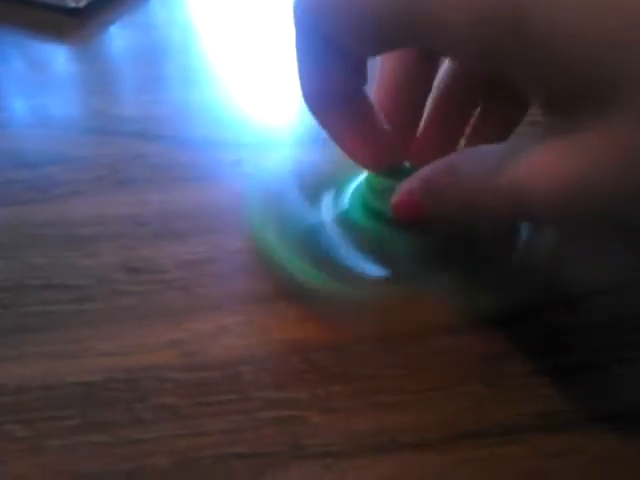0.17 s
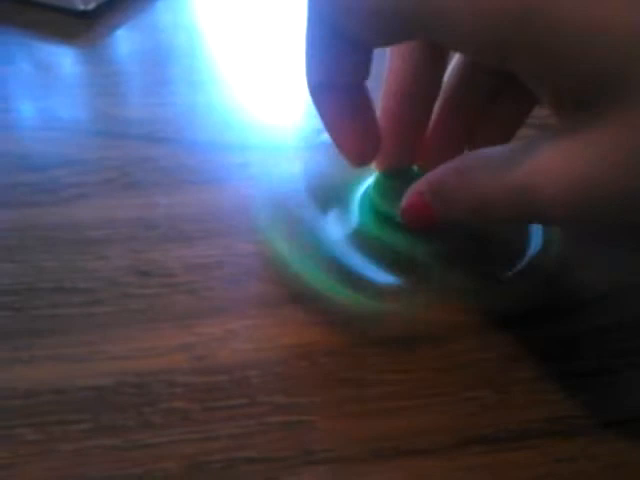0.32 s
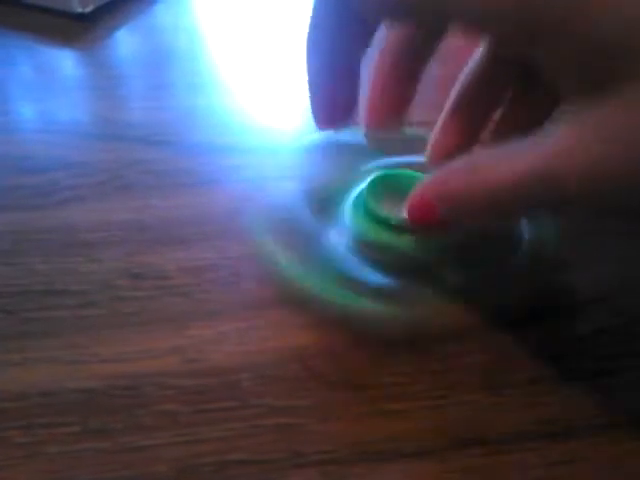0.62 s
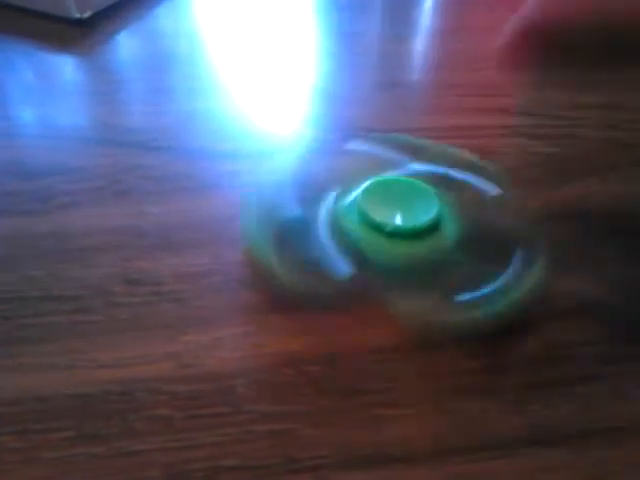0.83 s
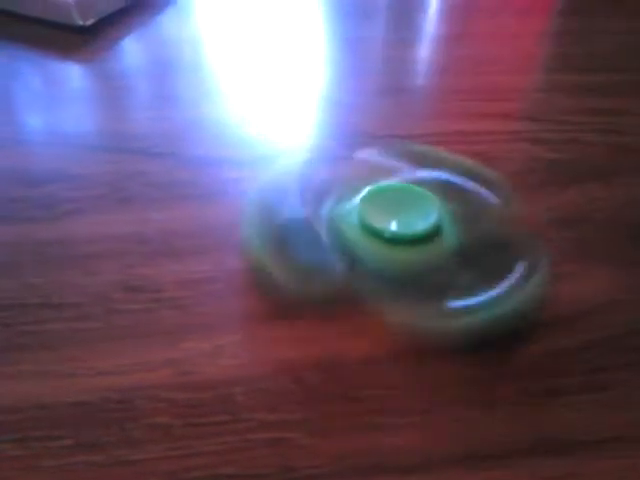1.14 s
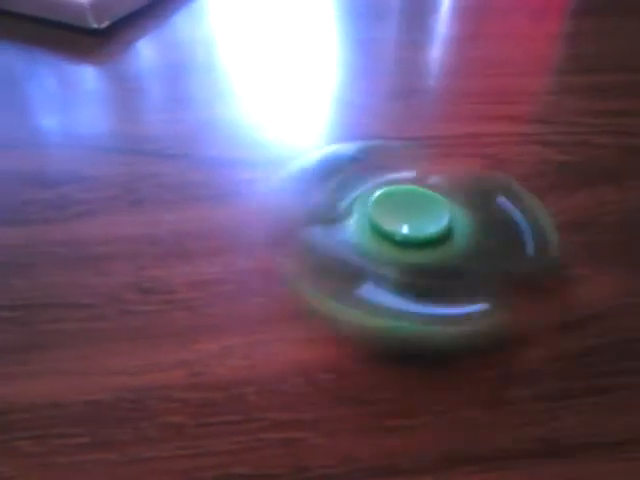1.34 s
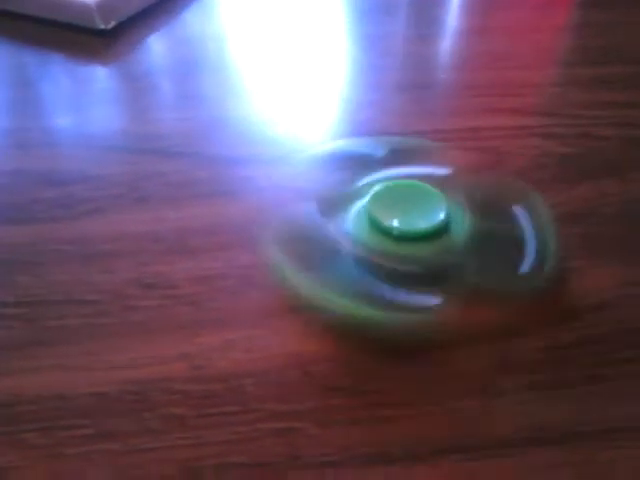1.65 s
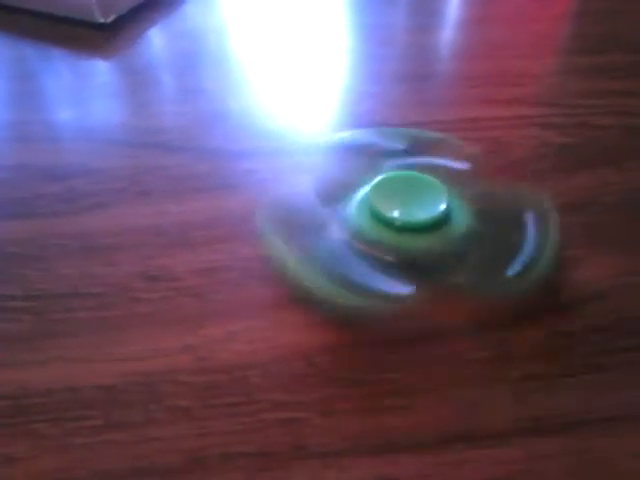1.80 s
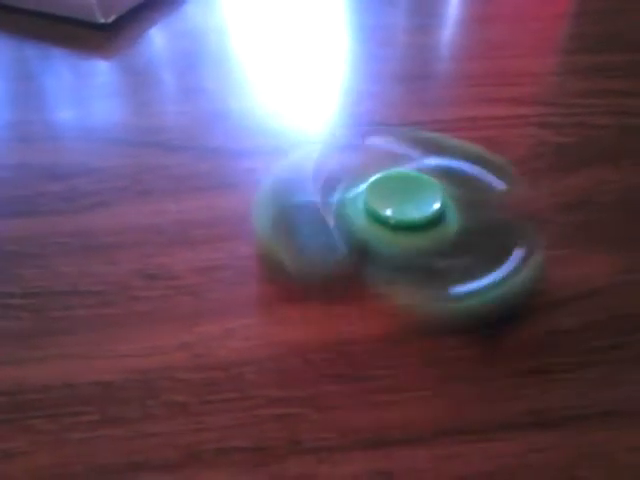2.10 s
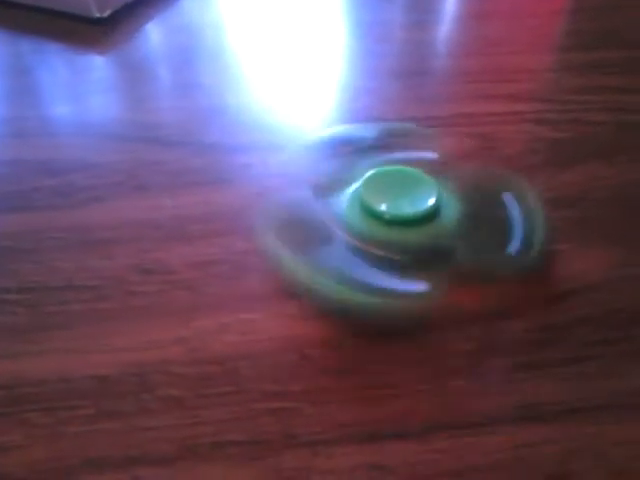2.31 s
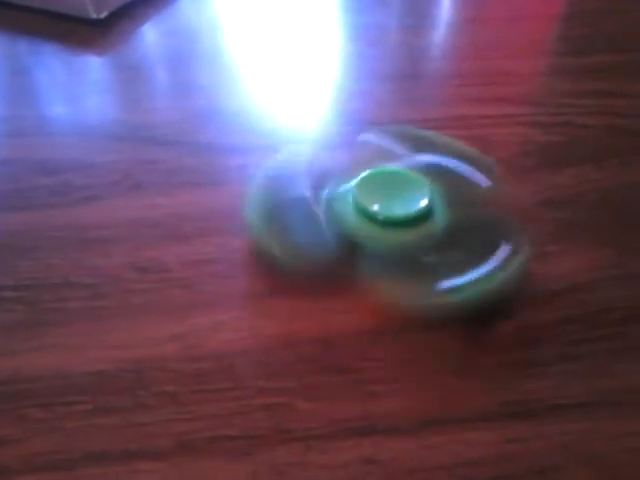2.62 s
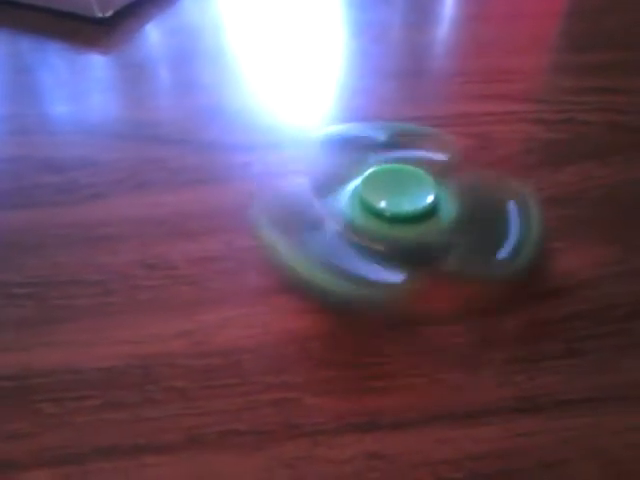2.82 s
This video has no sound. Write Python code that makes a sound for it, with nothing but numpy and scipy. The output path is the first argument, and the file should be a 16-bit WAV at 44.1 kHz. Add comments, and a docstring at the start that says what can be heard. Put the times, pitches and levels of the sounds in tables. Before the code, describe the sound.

A plastic fidget spinner whirs and rattles on a wooden table, ticking in quick uneven knocks

```python
"""A plastic spinner wobbles on a wooden table close to a small microphone.
An arm knocks on some turns: a grainy plastic tick with a short hiss of tail, and a dull ring of table modes.
Between knocks the cap chatters on the wood: random taps ring the modes, and grains of hiss and scrape join in.
Fingers bump the table, heard as bursts of low resonant noise; quiet room noise lies under it all.
Patches of the treble differ between the two channels."""
import sys
import numpy as np
from scipy import signal
from scipy.io import wavfile
from scipy.ndimage import uniform_filter1d

SR = 44100
rng = np.random.default_rng(int(sys.argv[2]) if len(sys.argv) > 2 else 0)


def volts(x):
    """Linear amplitude factor 10**(x/20) for a level x in dB, scalar or array-like."""
    e = np.asarray(x, float) / 20
    return 10 ** e


def log_audio(samples):
    """Write samples as a 16-bit WAV file to the path given in sys.argv[1]."""
    # one column per channel
    frames = np.atleast_2d(samples).T
    # limit to full scale, then quantise
    limited = np.clip(frames, -1, 1)
    pcm = np.round(limited * 32767).astype(np.int16)
    wavfile.write(sys.argv[1], SR, pcm)


N = 130095

# Knocks of the arm. Each row: start in seconds, tick level in dB, thud peak in dB, centre of the tick's
# colour in Hz, lift of the lowest plastic resonance in dB, lift of the next two in dB.
KNOCKS = [(0.054, -60, -44, 6860, 4, 10), (0.2082, -77, -44.5, 5200, 3, 4), (0.2289, -46, -49, 9700, 14, 5),
          (0.2625, -47.5, -48, 9900, 17, -17), (0.3142, -46, -36.5, 9500, 6, 0),
          (0.3629, -46.5, -34.5, 10000, 4, 4), (0.4084, -72, -61, 9930, 5, -3),
          (0.4625, -36, -46, 9300, 14.5, 3.5), (0.5086, -63, -36, 9750, 0, 13),
          (0.5637, -46, -35.5, 9400, 17, -11), (0.614, -40, -39, 9800, 21, 4),
          (0.6648, -30.5, -44, 8400, 12, 7.5), (0.6694, -33.5, -54, 8600, 11, 6),
          (0.7172, -22, -32, 7160, -12, -1), (0.768, -27.5, -32.5, 8400, 0.5, -1),
          (0.8177, -34.5, -37, 10600, -15, -8), (0.9206, -37.5, -35, 9100, 6, 3),
          (0.9698, -52.5, -39.5, 6900, -6, 20), (1.0277, -39, -37, 8900, 18.5, 10),
          (1.0734, -47, -38, 8900, 8, 10), (1.1292, -36.5, -35, 9400, 10.5, -28),
          (1.1808, -29.5, -37.5, 9200, -5, 4), (1.2308, -49, -59, 4780, 5, 10),
          (1.284, -27.5, -38, 7200, -3, 12.5), (1.2902, -30, -40.5, 10100, 11, 13),
          (1.3363, -51.5, -37.5, 7800, -3, 14), (1.3965, -29.5, -40, 7700, 10.5, 12.5),
          (1.4021, -34.5, -41, 9550, 21, 15), (1.502, -30.5, -31, 8750, 4, 10),
          (1.5067, -31.5, -35, 6450, 9, 4), (1.5133, -36, -44, 6300, 15, 18),
          (1.5553, -35, -56, 9680, 15, 14), (1.5606, -30.5, -32, 5430, -8, 2),
          (1.6076, -24.5, -33, 7050, 3.5, -5), (1.619, -27, -33.5, 5750, -25, 2),
          (1.6449, -34, -37.5, 6500, 5, 0), (1.6604, -35.5, -43.5, 6800, 3, -12),
          (1.7149, -28.5, -35.5, 10800, -2, -8), (1.718, -27, -35, 5570, 5, 12),
          (1.7719, -35, -39, 8400, -4, -0.5), (1.8832, -31.5, -41, 7100, -0.5, -7.5),
          (2.0062, -56, -47.5, 8900, -2, 12), (2.1013, -29.5, -38, 6800, -1, -3.5),
          (2.2744, -32.5, -42, 5400, -7.5, -8), (2.3864, -28.5, -46, 7700, -18, -14),
          (2.562, -81, -45, 9600, 11, -5), (2.616, -30, -35, 8100, -24, 1),
          (2.6781, -50.5, -45, 9450, 2, 7), (2.7314, -48, -48, 6400, 2, 5),
          (2.7543, -56, -45, 9440, 26, 10), (2.814, -56, -48.5, 9000, 3, 10.5)]
# Table top modes. Each row: frequency in Hz, level in dB, t60 in seconds.
WOOD = [(60.1, -0.5, 0.09), (116.9, -6, 0.18), (154.4, -9, 0.28), (207.1, 1, 0.11), (230, -4.5, 0.32),
        (268.6, 3, 0.16), (319.2, 5.5, 0.043), (351, 0.5, 0.069), (398.5, -0.5, 0.076), (522, -9.5, 0.064),
        (635.6, -6.5, 0.047), (769, -14.5, 0.056), (891, -9.5, 0.045), (1071, -13, 0.033),
        (1566, -10, 0.058)]
# Plastic body resonances. Each row: frequency in Hz, width of the first of two passes in Hz, level in dB.
PLASTIC = [(1440, 258, -2), (2513, 425, -4.5), (3630, 700, 0), (5784, 1250, -3.5), (6800, 730, 0.5),
           (9050, 1570, 1.5), (10100, 790, 2.5), (10910, 850, -2), (13140, 1000, -6.5)]


def evened(x):
    """Scales to an rms of 1."""
    return x / np.sqrt(np.mean(x ** 2) + 1e-20)


def curve(table, column=1):
    """One column of a table, joined by straight lines in time."""
    rows = np.array(table)
    return np.interp(np.arange(N) / SR, rows[:, 0], rows[:, column])


def add(mix, start_s, sound):
    """Adds a sound into the mix, cut at the end."""
    part = mix[round(start_s * SR):][:len(sound)]
    part += sound[:len(part)]


def resonate(x, hz, width_hz):
    """A resonance of gain 1: shift to 0 Hz, one-pole low-pass, shift back."""
    r = np.exp(-np.pi * width_hz / SR)
    turn = np.exp(2j * np.pi * hz * np.arange(len(x)) / SR)
    return 2 * (turn * signal.lfilter([1 - r], [1, -r], x / turn)).real


def resonate_twice(x, hz, width_hz):
    """Two resonances in series, the second twice as wide."""
    return resonate(resonate(x, hz, width_hz), hz, 2 * width_hz)


def clicks(per_s, spread_db):
    """A random train of clicks of either sign, a few of them large."""
    size = volts(spread_db * np.minimum(rng.exponential(1, N), 4))
    sign = rng.choice([-1., 1.], N)
    return size * sign * (rng.random(N) < per_s / SR)


def wood_ring(sizes):
    """The table's decaying modes after one soft push; sizes says how much each mode is struck."""
    push_decay_s = 0.00075 / 4
    t = np.arange(SR // 5) / SR
    ring = np.zeros(len(t))
    for size, (hz, db, t60_s) in zip(sizes, WOOD):
        ring += size * volts(db - 60 * t / t60_s) * np.sin(2 * np.pi * hz * t)
    push = np.exp(-t[:400] / push_decay_s)
    return np.convolve(ring, push / push.sum())[:len(t)]


def plastic(x, gains_db):
    """The spinner's body colours a burst: resonances of set share, neighbours alternating in sign."""
    out = np.zeros(len(x))
    for k, ((hz, width_hz, db), gain_db) in enumerate(zip(PLASTIC, gains_db)):
        ring = resonate_twice(x, hz, width_hz)
        out += (-1) ** k * volts(db + gain_db) * np.sqrt(width_hz) * ring / np.linalg.norm(ring)
    return out * np.linalg.norm(x)


def room():
    """Hiss and rumble: noise shaped in short frames, with a slight flicker and uneven patches."""
    # Each row: frequency in Hz, relative density in dB per Hz.
    spectrum = [(15, -29), (25, -20), (153, -11.5), (245, 1), (506, -8.5), (679, -10.5), (862, -8),
                (1360, -18.5), (1510, -15.5), (2190, -18), (4870, -20), (6700, -23), (7860, -21.5),
                (9220, -29.5), (14500, -20)]
    level_db, flicker_db, patchy_db = -69, 1.5, 1.5
    frames, hz = N // 256 + 5, np.fft.rfftfreq(1024, 1 / SR)
    noise = rng.standard_normal((frames, 513, 2)) @ [1, 1j]
    f, db = np.transpose(spectrum)
    field_db = np.interp(np.log(hz + 1), np.log(f + 1), db) + flicker_db * rng.standard_normal((frames, 1))
    patches = uniform_filter1d(rng.standard_normal(field_db.shape), size=10, axis=0)
    field_db += patchy_db * evened(uniform_filter1d(patches, size=16, axis=1))
    hiss = signal.istft((noise * volts(field_db)).T, nperseg=1024, noverlap=768)[1][:N]
    return volts(level_db) * evened(hiss)


def bumps():
    """The table's lowest mode, shaken by the hand: resonant noise, levelled, then drawn by a curve."""
    # Each row: time in seconds, level in dB.
    shakes = [(0.0, -79), (0.06, -65), (0.16, -85), (0.21, -39.5), (0.36, -85), (0.43, -37.5), (0.48, -35),
              (0.52, -52), (0.66, -43), (0.69, -59), (0.84, -48.5), (0.89, -82), (0.91, -57), (1.22, -54),
              (1.26, -93), (1.41, -46.5), (1.49, -76), (1.51, -63), (1.84, -74), (2.3, -73), (2.52, -67),
              (2.57, -47.5), (2.61, -38), (2.66, -66), (2.92, -61), (2.95, -41)]
    low = resonate_twice(rng.standard_normal(N), hz=51, width_hz=24)
    steady = low / np.sqrt(uniform_filter1d(low ** 2, SR // 25) + 1e-12)
    return volts(curve(shakes)) * steady


def chatter():
    """Small uneven taps of the cap ring the wood at eight spots; bearing and rim hiss, the cap scrapes."""
    # Each row: time in seconds, then levels before settling in dB: taps in the wood, hiss, scrape.
    levels = [(0, -60.5, -76.5, -81.5), (.12, -55.5, -74, -70), (.21, -44.5, -67, -62),
              (.29, -54.5, -70.5, -68.5), (.33, -53.5, -70.5, -69), (.47, -43.5, -60, -59.5),
              (.54, -51, -66.5, -67.5), (.6, -39.5, -60.5, -66.5), (.72, -41.5, -58, -69),
              (.84, -53, -64.5, -69), (.88, -88, -71, -83), (.915, -91, -100, -87), (.93, -45, -55, -62.5),
              (1.01, -54, -71, -76), (1.09, -53, -65.5, -72), (1.16, -37, -58.5, -63.5),
              (1.26, -61.5, -78.5, -77), (1.3, -72, -67.5, -74.5), (1.47, -50.5, -64, -67),
              (1.495, -75, -74, -73), (1.51, -38, -55.5, -62), (1.66, -52, -59, -65.5),
              (1.79, -52, -77, -76), (1.85, -91, -73.5, -93), (2.54, -92, -71.5, -86),
              (2.6, -50, -64.5, -62.5), (2.63, -38.5, -51.5, -65.5), (2.68, -55.5, -70, -71),
              (2.85, -66.5, -73, -86), (2.95, -71, -69.5, -74)]
    # Cap rubbing the wood. Each row: frequency in Hz, width of the first of two passes in Hz, level in dB.
    rub = [(657, 340, -0.5), (1005, 530, -0.5), (1670, 270, -2), (2580, 330, -4.5)]
    spots, taps_per_s = 8, 160  # over all spots
    taps = np.zeros(N)
    for _ in range(spots):
        hits = clicks(taps_per_s / spots, spread_db=1)
        taps += signal.oaconvolve(hits, wood_ring(rng.standard_normal(len(WOOD))))[:N]
    # even out the loudness, less so where the taps are sparse
    taps = taps / np.sqrt(uniform_filter1d(taps ** 2, SR // 12) + 0.45 * np.mean(taps ** 2))
    tilt_db = np.linspace(1, -0.5, len(PLASTIC))
    hiss = plastic(clicks(per_s=3500, spread_db=1.5), tilt_db)
    grit = clicks(per_s=1600, spread_db=2.5)
    scrape = sum(volts(db) * evened(resonate_twice(grit, hz, width_hz)) for hz, width_hz, db in rub)
    out = volts(curve(levels)) * taps
    out += volts(curve(levels, column=2)) * evened(hiss)
    return out + volts(curve(levels, column=3)) * evened(scrape)


def settling():
    """Gain of the chatter, which drops with the time since the last knock."""
    drop_db_per_s, most_db = 115, 7.5
    t, starts = np.arange(N) / SR, np.array([0] + [row[0] for row in KNOCKS])
    since_s = t - starts[np.searchsorted(starts, t, side="right") - 1]
    gain_db = most_db / 2 - np.minimum(drop_db_per_s * since_s, most_db)
    return volts(uniform_filter1d(gain_db, size=88))


def knock_tick(t, noise_a, noise_b, chance, tick_db, colour_hz, low_db, middle_db):
    """A short grainy crack and a hissing tail, both through the plastic; the crack peaks at tick_db."""
    # weak knocks are slower and blunter
    soft = 0.75 + 0.06 * max(-33 - tick_db, 0)
    rise_s, hold_s, t60_s = 0.0009 * soft ** 2, 0.0018, 0.014 * soft
    crack = (1 - np.exp(-t / rise_s)) * volts(-60 * np.maximum(t - hold_s, 0) / t60_s)
    tail_db, tail_rise_s, tail_t60_s = -9, 0.0013, 0.081  # the t60 counts from tail_db
    tail = (1 - np.exp(-t / tail_rise_s)) * volts(tail_db - 60 * (t / tail_t60_s) ** 1.49)

    octaves_off = np.log2([row[0] for row in PLASTIC]) - np.log2(colour_hz)
    lift_db = 8 * np.exp(-.5 * (octaves_off / 0.19) ** 2)
    lift_db[:3] += low_db, middle_db, middle_db
    sharp = plastic(crack * noise_a * abs(noise_b[::-1]), lift_db + 3.5 * chance[:len(PLASTIC)])
    # the tail takes less of the colour and is duller
    tail_lift_db = lift_db * 0.45 + np.linspace(0, -4, len(PLASTIC))
    hiss = plastic(tail * noise_b, tail_lift_db)
    return volts(tick_db) * (sharp + hiss) / abs(sharp).max()


def knock_thud(t, chance, tick_db, thud_db):
    """Ring of the wood, its upper modes harder when tick exceeds thud; the spinner damps the ring."""
    rise_s, damping_t60_s = 0.003, 0.29
    upper_db = 0.5 * max(tick_db - thud_db, 0) * (np.array(WOOD)[:, 0] > 450)
    signs = np.where(chance[0] > -.4, 1, -1)
    ring = wood_ring(volts(3.5 * chance[1] + upper_db) * signs)[:len(t)]
    thud = ring * (1 - np.exp(-t / rise_s)) * volts(-60 * t / damping_t60_s)
    return -volts(thud_db) * thud / abs(thud).max()


def knocks():
    """The arm's knocks: each excites the plastic (tick) and the wood (thud) at once."""
    out, t = np.zeros(N), np.arange(SR // 6) / SR
    for start_s, tick_db, thud_db, colour_hz, low_db, middle_db in KNOCKS:
        noise_a, noise_b = rng.standard_normal((2, len(t)))
        chance = rng.standard_normal((2, len(WOOD)))
        add(out, start_s, knock_tick(t, noise_a, noise_b, chance[0], tick_db, colour_hz, low_db, middle_db))
        add(out, start_s, knock_thud(t, chance, tick_db, thud_db))
    return out


def scene():
    """One microphone feeds both channels."""
    return np.tile(knocks() + settling() * chatter() + bumps() + room(), (2, 1))


def widened(x):
    """Adds noise of opposite sign per channel in treble patches, except where the sound jumps up sharply."""
    from_hz, full_hz, full_share, side_gain_db, sharp_db = 4100, 7800, .8, -3.5, 12
    hz, _, z = signal.stft(x, SR, nperseg=1024, noverlap=768)
    # patches of 24 bins by 4 frames
    bands, steps = len(hz) // 24 + 1, z.shape[1] // 4 + 1
    luck = evened(uniform_filter1d(rng.standard_normal((bands, steps)), size=2, axis=1))
    luck = np.repeat(np.repeat(luck, 24, axis=0), 4, axis=1)[:len(hz), :z.shape[1]]
    share = full_share * np.clip((hz - from_hz) / (full_hz - from_hz), 0, 1)
    patch = 1 / (1 + np.exp(-1.7 * luck)) < share[:, None]

    level_db = 10 * np.log10((abs(z[hz > 3000]) ** 2).mean(0) + 1e-20)
    past_jump_db = level_db - np.roll(level_db, 3)
    next_jump_db = np.roll(level_db, -1) - np.roll(level_db, 2)
    calm = np.maximum(past_jump_db, next_jump_db) < sharp_db

    size = np.sqrt(abs(uniform_filter1d(abs(z) ** 2, size=12, axis=0))) * patch * calm
    noise = rng.standard_normal(z.shape + (2,)) @ [1, 1j]
    side = signal.istft(size * noise, nperseg=1024, noverlap=768)[1][:N]
    return x + volts(side_gain_db) * np.array([side, -side])


def low_pass(x):
    """Removes everything above the highest recorded frequency."""
    return signal.sosfilt(signal.butter(12, 14820, fs=SR, output="sos"), x)


def record(dry):
    """Band limits of the microphone, the wide treble, then a small steady offset."""
    x = signal.sosfilt(signal.butter(2, 37, "high", fs=SR, output="sos"), dry[0])
    x = signal.sosfilt(signal.butter(24, 14550, fs=SR, output="sos"), x)
    offset = -.0012
    return low_pass(widened(x) + offset)


dry = scene()
out = record(dry)
log_audio(out)
```